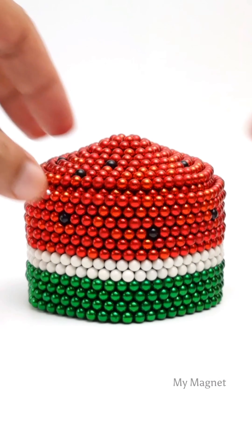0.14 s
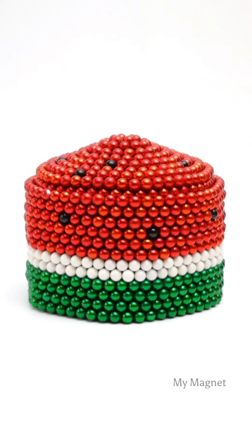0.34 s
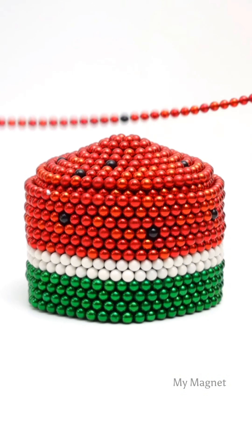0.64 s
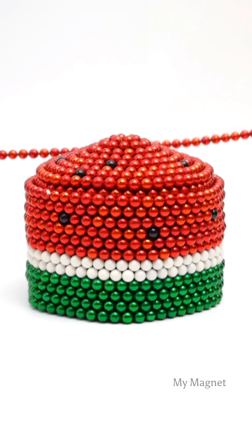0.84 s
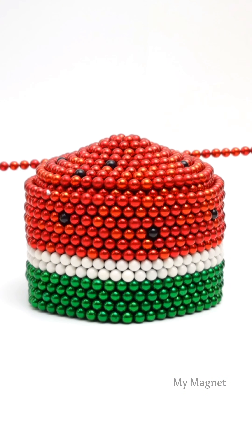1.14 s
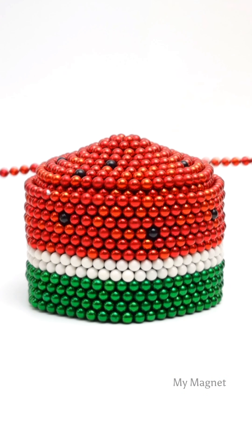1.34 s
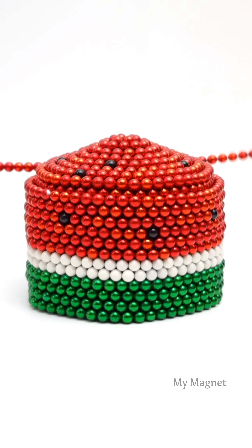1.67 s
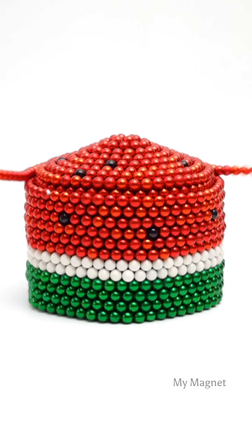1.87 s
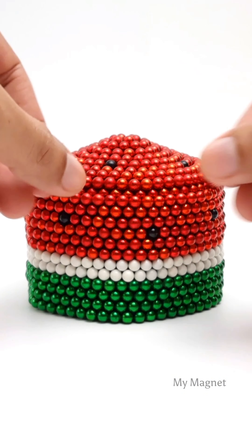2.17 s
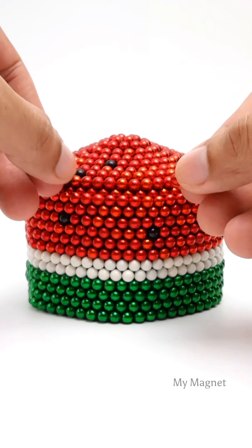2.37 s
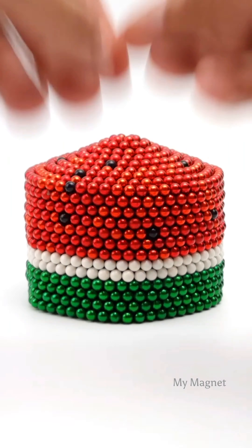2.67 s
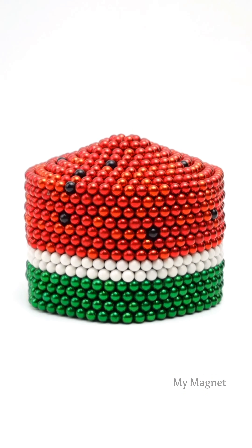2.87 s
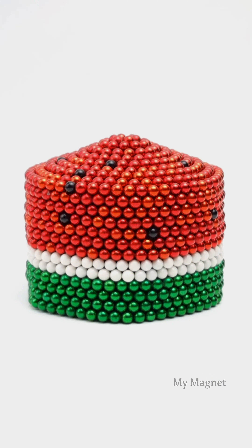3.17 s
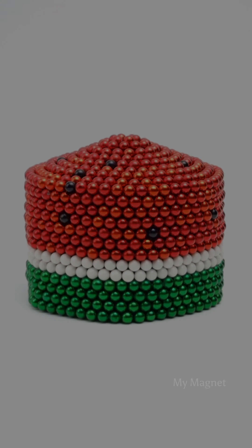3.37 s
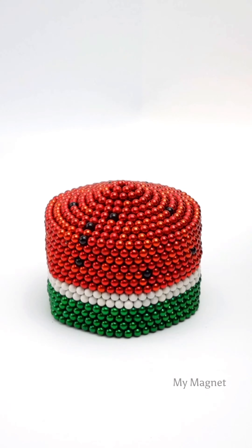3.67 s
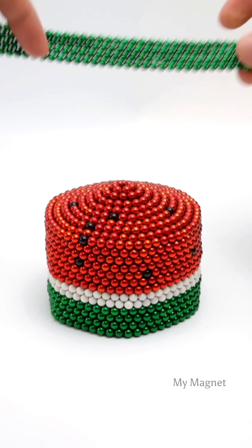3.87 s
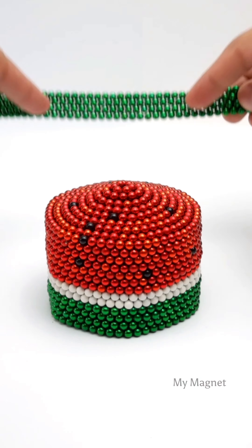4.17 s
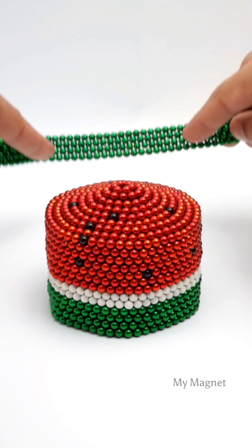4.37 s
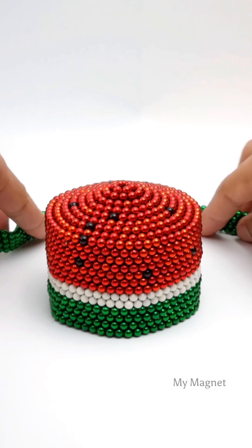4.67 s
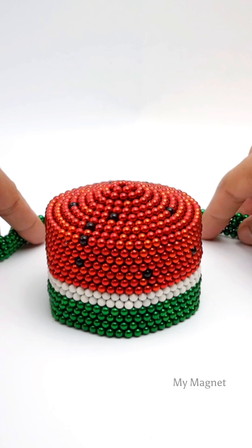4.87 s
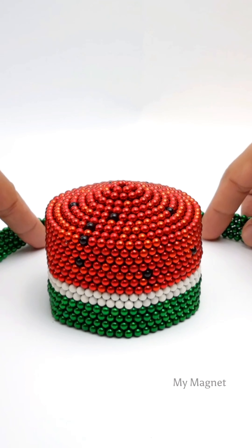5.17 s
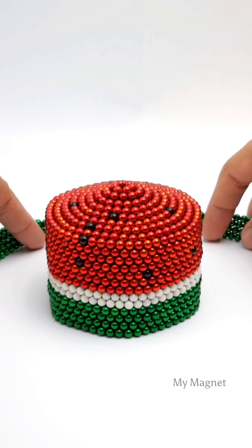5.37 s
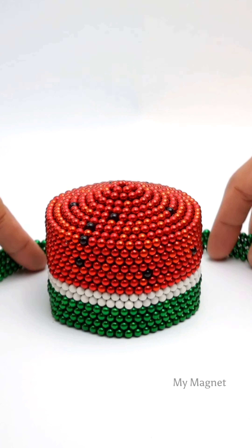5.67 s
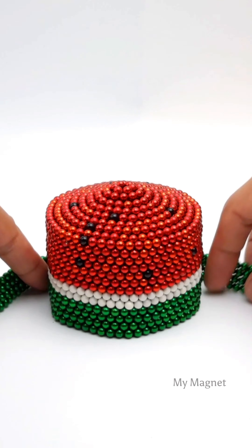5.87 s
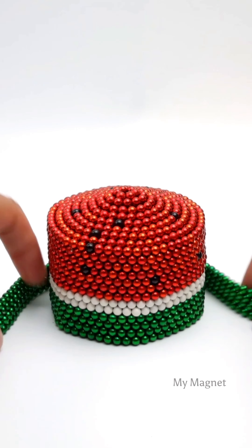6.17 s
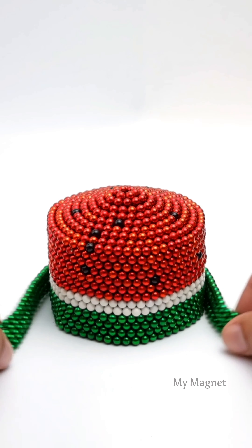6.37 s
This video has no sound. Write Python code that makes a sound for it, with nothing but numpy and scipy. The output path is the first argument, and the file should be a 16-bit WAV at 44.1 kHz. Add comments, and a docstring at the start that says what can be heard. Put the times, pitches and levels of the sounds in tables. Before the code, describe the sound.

Magnetic balls snap together in hard clacking bursts, with soft table thuds, a loud double slam, a brief scrape and echoing room tail.

```python
"""First heard is the fading end of a blow on an open dome of small magnetic balls on a table top.
Hands then lay chains and a band of balls around the dome: balls snap together in bursts of clicks
that excite damped modes; the band drops with bright ticks after it and is dragged; the table thuds softly.
A late, wide reverberation of sparse reflections follows the balls and is twice cut off.
Table rumble and hiss are filtered noise beneath."""
import sys
import numpy as np
from scipy import signal
from scipy.fft import rfft, irfft
from scipy.io import wavfile
from scipy.ndimage import uniform_filter1d

SR = 44100
rng = np.random.default_rng(int(sys.argv[2]) if len(sys.argv) > 2 else 0)


def persist_wave(psi):
    """Save psi, clipped to +-1, as 16-bit WAV."""
    counts = np.round(np.clip(psi, -1, 1) * 32767).astype(np.int16)
    wavfile.write(sys.argv[1], SR, np.atleast_2d(counts).T)


N = 287532
LEAD = 8820  # samples played before time zero


def gain_of(db):
    """Logarithmic level: decibels to an amplitude factor."""
    return 10 ** (np.asarray(db) / 20)


def evened(x):
    """Power normalisation: scales to rms 1."""
    return x / np.sqrt(np.mean(x ** 2) + 1e-20)


def sized(x, db, t60):
    """Energy equivalence: gives x the energy of a decay that starts at rms db and lasts t60."""
    decay_norm = np.sqrt(t60 * SR / (2 * np.log(1000)))
    return gain_of(db) * x * decay_norm / np.linalg.norm(x)


def read(points, hz):
    """Spectral interpolation on a log-frequency axis."""
    f, value = np.transpose(points)
    return np.interp(np.log(hz + 1), np.log(f + 1), value)


def add(mix, s, sound):
    """Superposition: adds a sound at time s to a mix that starts before zero."""
    part = mix[round(s * SR) + LEAD:][:len(sound)]
    part += sound[:len(part)]


def coloured(points, channels):
    """Stationary noise: white noise shaped to the given spectrum, at rms 1."""
    white = rfft(rng.standard_normal((channels, N)))
    shape = gain_of(read(points, np.fft.rfftfreq(N, 1 / SR)))
    return evened(irfft(white * shape, N))


def burst(t60, size=8192):
    """Impulsive excitation: uneven clicks of closing balls die away after a strong first one."""
    t = np.arange(size) / SR
    uneven_db = 3.0 * np.minimum(rng.exponential(1, size), 3)
    present = rng.random(size) < .25
    clicks = rng.standard_normal(size) * gain_of(uneven_db) * present
    clicks[0] = -9.5
    room_tail = gain_of(-19.5 - 60 * t / .22)  # weak slow tail of the burst, like a small room
    return clicks * (gain_of(-60 * t / max(t60, .002)) + room_tail * (t60 > .015))


def peak(hz, f, width):
    """Resonance: one steep-sided causal response, 9 dB down at width Hz from its centre."""
    return (width / (width + 1j * (hz - f))) ** 3


def struck(drive, modes):
    """Modal superposition: spectrum of driven modes, each given its due energy."""
    hz, out = np.fft.rfftfreq(16384, 1 / SR), 0
    drive_spectrum = rfft(drive, 16384)
    for f, width, db in modes:
        mode = peak(hz, f, width)
        rung = drive_spectrum * mode
        out = out + gain_of(db) * rung * np.linalg.norm(mode) / np.linalg.norm(rung)
    return out


# steady hiss spectrum: frequency_hz, relative_density_db (per Hz)
HISS_SPECTRUM = [(290, -27), (500, -1), (855, -16), (1050, -7), (1900, -10.5), (2430, -12.5), (2980, -12.5),
                 (5240, -11.5), (7420, -8), (16000, -16)]


def hiss():
    """Broadband noise floor: two partly correlated channels of steady noise."""
    a, b = coloured(HISS_SPECTRUM, channels=2)
    return gain_of(-80) * np.array([a + 0.41 * b, a - .3 * b])


def air():
    """Amplitude-modulated noise: faint treble hiss with a quick rise, slow climb and steady fade."""
    start_s, rise_s, climb_s = 5.616, .025, 0.48  # during the drag
    start_db, climb_db, fade_db_per_s = -72.5, 4, 38.5
    t = np.arange(N) / SR - start_s
    db = start_db + climb_db * np.clip(t / climb_s, 0, 1)
    db -= fade_db_per_s * np.maximum(t - climb_s, 0)
    noise = coloured([(2500, -17.5), (3500, -5.0), (8000, -13), (16000, -22.5)], channels=2)
    return noise * gain_of(db) * np.clip(t / rise_s, 0, 1)


# course of the table's rumble: time_s, level_db
RUMBLE_LEVEL = [(0, -61.5), (.55, -76.5), (.65, -59), (.77, -58), (.88, -73), (1.0, -51), (1.8, -65.5),
                (2.071, -54), (2.3, -74), (2.37, -64), (2.699, -63.5), (2.849, -56), (3.2, -79),
                (3.66, -81), (3.671, -52.5), (3.96, -66.5), (4.4, -61.5), (4.56, -70.5), (4.72, -63),
                (4.829, -35), (4.93, -59), (5.59, -70.5), (5.67, -49.5), (5.941, -59), (6.28, -45),
                (6.52, -54)]
# rumble spectrum: frequency_hz, relative_density_db (per Hz)
RUMBLE_SPECTRUM = [(15, -38.5), (25, -13.5), (49, -3), (119, -3), (159, -11), (206, -23.5), (401, -31.5),
                   (510, -40), (1500, -47.5), (1950, -77.5), (3300, -120)]


def rumble():
    """Low-frequency random vibration of the table, lumpy and nearly alike in both channels."""
    lumps_db, lump_s = 3, .06  # rms swing of the level, smoothing span
    s, db = np.transpose(RUMBLE_LEVEL)
    a, b = coloured(RUMBLE_SPECTRUM, channels=2)
    span = round(lump_s * SR)
    smooth = uniform_filter1d(rng.standard_normal(N), span)
    lumps = evened(uniform_filter1d(smooth, span))
    level_db = np.interp(np.arange(N) / SR, s, db) + lumps_db * lumps
    return np.array([a + .03 * b, a - .03 * b]) * gain_of(level_db)


# reverberation time by band: frequency_hz, t60_s
HALL_DECAY = [(100, .4), (300, 1.4), (700, 1.147), (1800, 1.223), (5000, 0.99), (8000, 0.71)]
# initial colour of the reverberation: frequency_hz, relative_level_db
HALL_TINT = [(80, -23.5), (200, -7.5), (400, 0), (1000, 1), (3000, 2), (7000, -1.5)]
# moments at which an edit cuts off the reverberation: time_s
CUTS = [.44, 3.67]


def hall(x):
    """Late reverberation: delayed sparse reflections whose bands die at their own speeds, up to a cut."""
    delay_s, same = 0.036, 0.13  # gap before the tail, correlation of the channels' taps
    uneven_db, blend_s = 4.5, .25  # single reflections stand out early, then blend
    echo_s, echo_gap_s, echo_db = .018, 0.029, 4.5  # evenly spaced swells in the tail

    # one tap of random sign in every 40 samples
    size = 2 * SR
    taps = np.zeros((2, size))
    at = np.arange(0, size - 40, 40) + rng.integers(0, 40, (2, (size - 1) // 40))
    np.put_along_axis(taps, at, rng.choice([-1., 1.], at.shape), 1)
    scatter = np.minimum(rng.exponential(1, size), 4) - 1.5
    taps *= gain_of(uneven_db * np.exp(-np.arange(size) / SR / blend_s) * scatter)
    taps[1] = same * taps[0] + np.sqrt(1 - same ** 2) * taps[1]

    hz, t, z = signal.stft(taps, SR, nperseg=256)
    decay_db = 60 * t / read(HALL_DECAY, hz)[:, None]
    z = z * gain_of(read(HALL_TINT, hz)[:, None] - decay_db)
    tail = signal.istft(z, SR, nperseg=256)[1]

    late = np.arange(tail.shape[1]) / SR
    tail *= 1 - np.exp(-late / 0.009)  # the tail builds up
    turn = np.round((late - echo_s) / echo_gap_s).clip(0)
    swell = np.exp(-((late - echo_s - turn * echo_gap_s) / 0.0052) ** 2) * (late < .34)
    tail *= gain_of(echo_db * swell)
    tail = np.pad(tail / np.linalg.norm(tail[0]), [(0, 0), (round(delay_s * SR), 0)])

    shots = np.split(x, [round(s * SR) + LEAD for s in CUTS])
    wet = [signal.fftconvolve(shot[None], tail, axes=1)[:, :len(shot)] for shot in shots]
    return np.hstack(wet)


# hands and drops push the table: time_s (just before the crest), level_db (lower partial),
# pitch_hz (lower partial), length_s (between the 1/e points)
TABLE_THUDS = [(.654, -48.5, 91, .016), (.764, -37, 127, 0.011), (1.094, -41.5, 85, 0.019),
               (1.535, -28.5, 127.5, 0.018), (1.559, -28, 90.5, 0.016), (2.741, -14, 130, 0.0088),
               (2.759, -18, 140, 0.019), (2.789, -23, 89.5, 0.022), (4.757, -24.5, 146, 0.017),
               (4.79, -24, 65.4, 0.018), (5.078, -23, 176, 0.012), (5.1, -26.5, 185, 0.018),
               (6.089, -26, 190.7, 0.0148), (6.105, -20.5, 144, 0.0202), (6.129, -25, 205, 0.0145),
               (6.149, -22, 151.5, 0.0159), (6.185, -24, 152, 0.022), (6.235, -29.5, 242, 0.014)]


def thuds(mix):
    """Forced low modes: a soft push sounds two partials that swell and fade under a Gaussian."""
    for (s, db, f, length), turn in zip(TABLE_THUDS, rng.random(len(TABLE_THUDS))):
        t = np.arange(-3 * length, 3 * length, 1 / SR)
        lower = -np.cos(2 * np.pi * f * t)
        upper = .4 * np.cos(2 * np.pi * (1.9 * f * t + turn))
        envelope = np.exp(-(t / length * 2.0) ** 2)
        add(mix, s - 2.7 * length, gain_of(db) * envelope * (lower + upper))


# the drag: time_s, level_db, highest_excited_hz, rasp_db (broad rasp against the table's modes)
DRAG_STROKE = [(5.61, -59, 299, -28), (5.66, -36, 477, -24.5), (5.691, -26, 920, -31.5),
               (5.72, -24, 1700, -39), (5.765, -23, 2350, -32.5), (5.79, -25, 2270, -6.5),
               (5.92, -24.5, 2180, -11), (6.0, -30.5, 1700, -3.5), (6.059, -31, 1200, -19.5),
               (6.1, -44, 920, -13.5)]
# modes of the table top: frequency_hz, width_hz, peak_db
TABLE_MODES = [(232, 60, -12.5), (325, 49.5, 5), (421, 65, 1), (531, 97, -2), (652, 164, -10.5),
               (1008, 35, 0), (1192, 53, -10), (1610, 51, -9.5), (2352, 32, -9.5)]


def drag(mix):
    """Stick-slip friction: random slips excite table modes up to a moving limit, plus a broad rasp."""
    s, db, *controls = np.transpose(DRAG_STROKE)
    size = round((s[-1] - s[0]) * SR)
    uneven = gain_of(1.5 * rng.exponential(1, size))
    slips = rng.standard_normal(size) * uneven * (rng.random(size) < .1)
    hz, t, z = signal.stft(slips, SR, nperseg=1024, noverlap=768)
    top_hz, rasp_db = (np.interp(t + s[0], s, c) for c in controls)
    soft = 1 / (1 + (hz[:, None] / top_hz) ** 9.1) / (1 + (hz[:, None] / 2500) ** 30)
    body = np.sqrt(sum(abs(gain_of(mode_db) * peak(hz, f, w)) ** 2 for f, w, mode_db in TABLE_MODES))
    rasp = gain_of(rasp_db) * abs(peak(hz, 1227, 800))[:, None]
    z = z * soft * (body[:, None] + rasp)
    z /= uniform_filter1d(np.linalg.norm(z, axis=0), 5) + 1e-12  # the level follows the stroke alone
    rub = evened(signal.istft(z, SR, nperseg=1024, noverlap=768)[1][:size])
    stroke = gain_of(np.interp(s[0] + np.arange(size) / SR, s, db))
    add(mix, s[0], rub * stroke * signal.windows.tukey(size, .05))


# dry bright ticks after the slam, probably its early reflections: start_s, level_db
SLAM_REFLECTIONS = [(5.1223, -42), (5.1342, -31.5), (5.1415, -43.5), (5.1507, -36.5), (5.1623, -32),
                    (5.1806, -27.5), (5.2165, -43), (5.254, -40), (5.2784, -44.5), (5.3173, -39)]


def slam_reflections(mix):
    """Heavily damped resonance: short bursts on two broad treble modes give dry bright ticks."""
    for s, db in SLAM_REFLECTIONS:
        rung = irfft(struck(burst(0.01), [(4700, 2500, 0.0043), (6830, 3700, 0.012)]))
        add(mix, s, sized(rung, db, 0.0061))


# tones of balls touching: start_s, level_db, pitch_hz, t60_s (of the exciting burst)
TOUCH_TONES = [(.944, -45.5, 771, 0.056), (0.944, -55, 1670, 0.045), (1.511, -41.5, 851, 0.15),
               (1.511, -41, 1460, 0.09), (1.552, -49.5, 4393, 0.032), (1.947, -50.5, 820, 0.42),
               (1.949, -69.5, 6300, 0.075), (2.006, -58.5, 6280, 0.086), (2.384, -60.5, 1046, 0.049),
               (5.188, -37, 4810, 0.065), (5.17, -42.5, 6460, .08), (5.76, -62, 3950, 0.064),
               (6.021, -58, 3280, 0.11), (6.019, -48.5, 4010, .12), (6.02, -52, 5830, 0.13),
               (6.02, -50.5, 6680, .063), (6.415, -45, 4720, 0.034)]


def pings(mix):
    """Selective resonance: a burst of contacts rings one narrow band."""
    for s, db, f, t60 in TOUCH_TONES:
        rung = irfft(struck(burst(t60), [(f, 0.059 * f, 0)]))
        add(mix, s, sized(rung, db, t60))


# hard single-cycle knocks within the band's blows: start_s, level_db (peak of the cycle), pitch_hz
HARD_KNOCKS = [(4.7508, 4.5, 933), (4.782, 6, 2220), (5.0723, 1.5, 786)]


def slams(mix):
    """Impact pulse: one hard cycle, pressure drop first."""
    for s, db, f in HARD_KNOCKS:
        cycle = np.sin(2 * np.pi * np.arange(0, 1, f / SR))
        add(mix, s, -gain_of(db) * cycle)


# modes of each object: frequency_hz, width_hz, relative_level_db
OPEN_DOME_MODES = [(321, 36, -4), (750, 116, -4.5), (1102, 92, 6.5), (1196, 105, 6.5), (1625, 105, 3.5),
                   (1828, 103, 1.5), (2130, 75, -32), (2450, 61, -14), (2744, 230, -6), (2900, 210, 2),
                   (4430, 490, -4), (5460, 190, 1.5), (6500, 2000, -17)]
CHAIN_MODES = [(151.5, 42, -0.5), (330, 38, 9), (830, 220, -1), (2022, 94, 8.5), (3240, 920, -36),
               (4240, 850, -4), (5440, 900, -4), (6330, 1330, -11.5)]
DOME_MODES = [(159, 50, -2), (333, 40, -4.5), (540, 240, 2), (750, 60, 4.5), (1040, 75, 1.5),
              (1260, 92, -1), (1541, 55, 11.5), (1849, 56, 8.5), (2040, 180, -14), (2510, 590, -3.5),
              (2960, 210, -1.5), (3219, 527, 8.5), (3601, 340, 1.5), (4372, 600, -1), (5200, 580, -9.5),
              (5780, 660, -7.5), (6510, 2200, -4)]
BAND_MODES = [(200.5, 25, -4.5), (307, 26, 3), (422, 60, 5.5), (511, 33, 7.5), (699, 31, -0.5),
              (770, 59, -1), (1051, 40, 7.5), (1176, 100, 6.5), (1465, 280, 5.5), (1545, 43, -0.5),
              (1978, 250, -4.5), (2218, 140, 1), (2332, 93, 3), (2900, 240, -14.5), (3152, 150, 4.5),
              (3840, 400, -1), (5117, 790, -9), (5510, 810, 1.5), (5950, 2000, -2.5)]
# edges of the registers thud, knock, clack, click and tick: edge_hz
REGISTER_EDGES = [0, 450, 1350, 2500, 3900, 9000]
# a middling blow's balance by object: thud_db, knock_db, clack_db, click_db, tick_db
REGISTER_BALANCES = {"open dome": (-8.5, 0, 1, -11.5, -6), "chain": (-0.5, -7, -12, -29, -10.5),
                     "dome": (-3, 0, 0.5, -8, -8.5), "band": (-1.5, 1.5, -4.5, -14, -17.5)}
# blows: start_s, object, level_db, hardness_db (per register upward),
# spread_db (per squared register step from the middle), t60_s (of the burst of balls closing up)
OBJECT_BLOWS = [(-.12, "open dome", -18.5, .1, 0.38, 0.034), (.944, "chain", -47, 1.5, 1.56, .07),
                (1.506, "chain", -35, -0.7, -2, .17), (1.533, "chain", -43.5, -1.5, 1.44, 0.13),
                (2.722, "dome", -41, -1, 0.4, .076), (2.7331, "dome", -8.5, 1.3, -0.19, 0.058),
                (2.737, "dome", -11, -0.6, 0.45, 0.045), (4.7493, "band", -3, 2, -1, .026),
                (4.758, "band", -13, 0.2, 0.72, 0.1), (4.7804, "band", 0.9, 6.5, -2.5, 0.051),
                (5.071, "band", 0, 6, -0.17, .005), (5.075, "band", -18, -2, 2.06, 0.03),
                (5.082, "band", -35.5, -6, 1.6, 0.1), (5.226, "band", -35.5, -2.5, 2.5, 0.039),
                (5.255, "band", -36.5, -4.5, 1.8, 0.034)]


def blows(mix):
    """Modal impact: a burst drives the object's modes; harder blows favour the upper registers."""
    objects = {"open dome": OPEN_DOME_MODES, "chain": CHAIN_MODES, "dome": DOME_MODES, "band": BAND_MODES}
    step = np.arange(5) - 2  # registers from the middle one
    for s, name, level_db, hard_db, spread_db, t60 in OBJECT_BLOWS:
        rung = irfft(struck(burst(t60), objects[name]))
        levels_db = level_db + np.array(REGISTER_BALANCES[name])
        levels_db = levels_db + hard_db * step + spread_db * step ** 2
        for lo, hi, db in zip(REGISTER_EDGES, REGISTER_EDGES[1:], levels_db):
            sos = signal.butter(2, [max(lo, 50), hi], "bandpass", fs=SR, output="sos")
            add(mix, s, sized(signal.sosfilt(sos, rung), db, t60))


def scene():
    """Direct and reverberant field: close balls and their reverberation, with dry thuds and rumble."""
    balls, hands = np.zeros((2, N + LEAD))
    thuds(hands)
    drag(balls)
    slam_reflections(balls)
    pings(balls)
    slams(balls)
    blows(balls)
    reverberation = gain_of(-11.5) * hall(balls)
    return (balls + hands + reverberation)[:, LEAD:] + rumble()


def record(dry):
    """Band-limited transduction: a narrow microphone channel, overload clipping, hiss, treble limit."""
    mic = signal.firwin(301, 7000, window=("kaiser", 8), fs=SR)  # low-pass, Hz
    narrow = signal.oaconvolve(dry, mic[None], "same")
    narrow = signal.sosfilt(signal.butter(2, 45., "highpass", fs=SR, output="sos"), narrow)
    loud = np.clip(narrow, -.97, .97) + hiss() + air()
    edge = signal.firwin(511, 16100, window=("kaiser", 9), fs=SR)  # low-pass, Hz
    return signal.oaconvolve(loud, edge[None], "same")


dry = scene()
out = record(dry)
persist_wave(out)
```